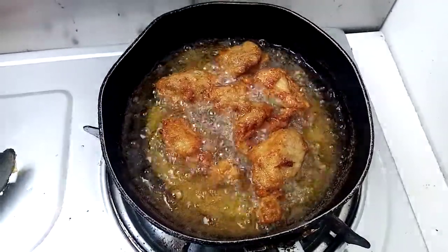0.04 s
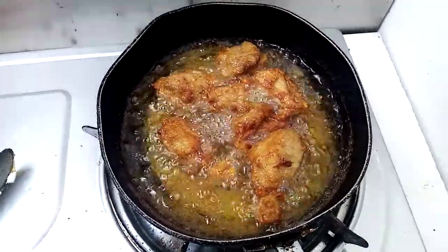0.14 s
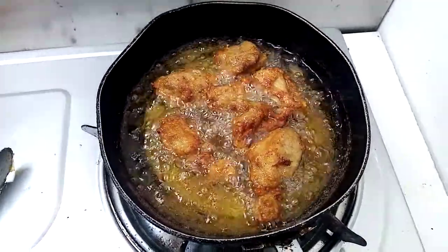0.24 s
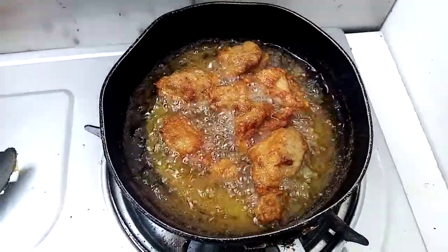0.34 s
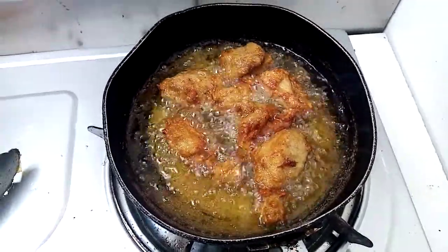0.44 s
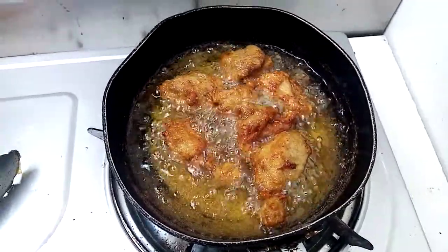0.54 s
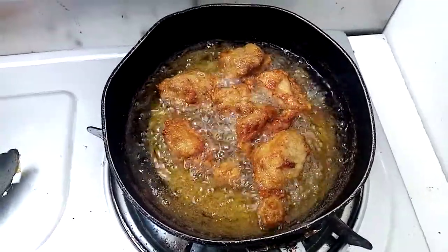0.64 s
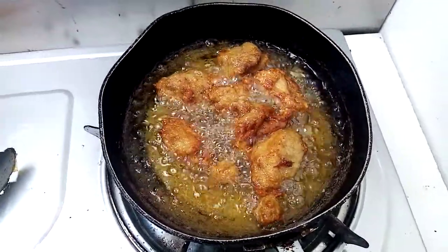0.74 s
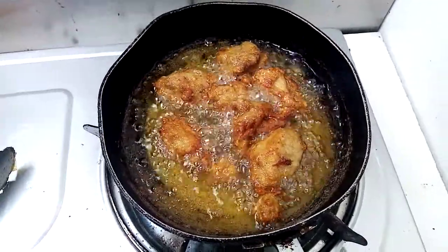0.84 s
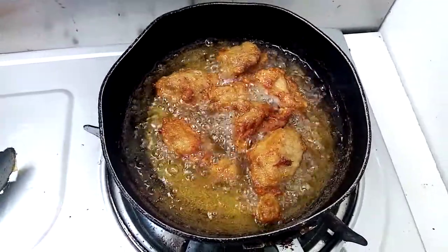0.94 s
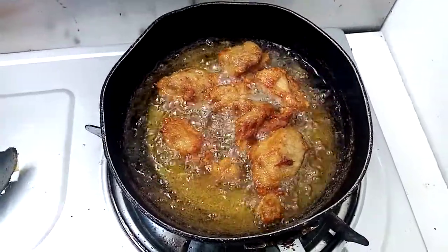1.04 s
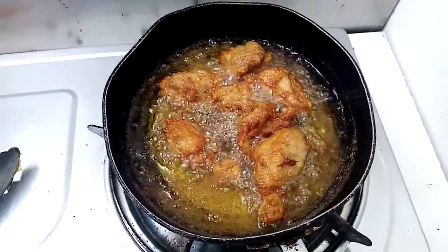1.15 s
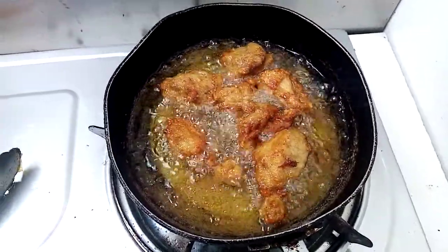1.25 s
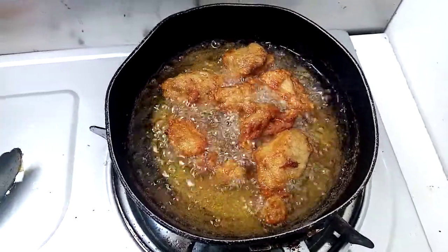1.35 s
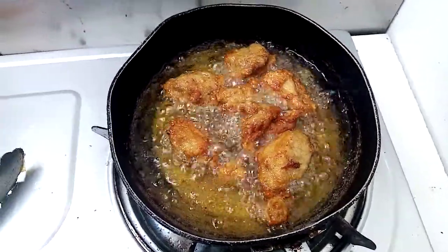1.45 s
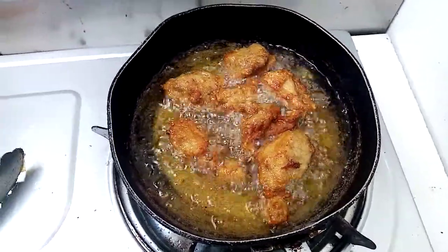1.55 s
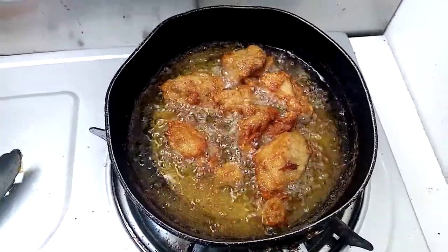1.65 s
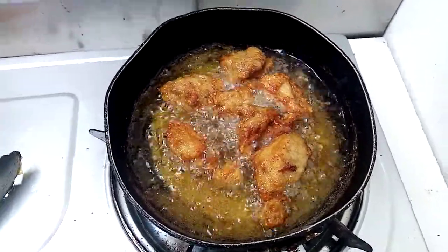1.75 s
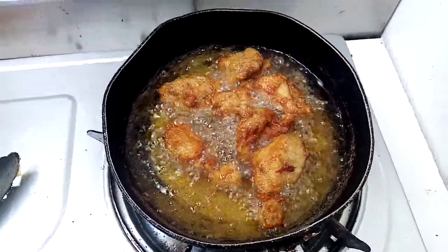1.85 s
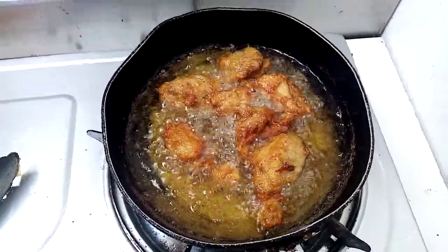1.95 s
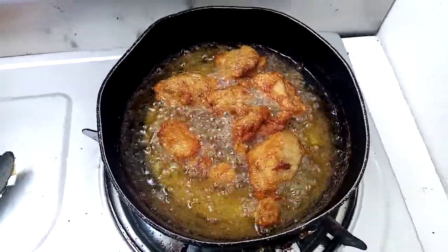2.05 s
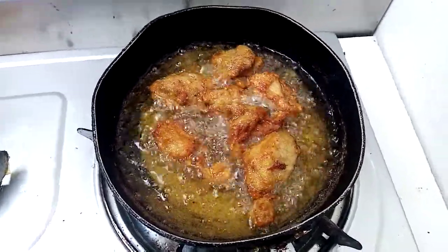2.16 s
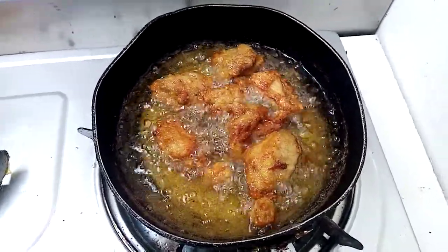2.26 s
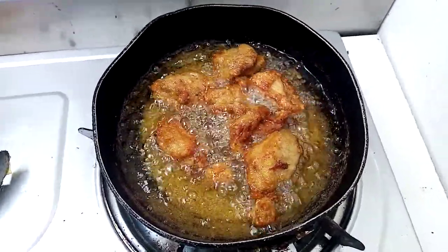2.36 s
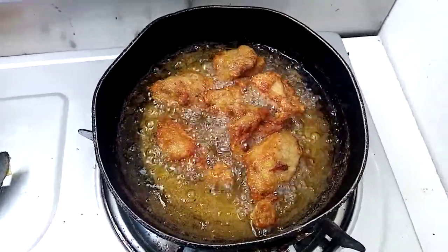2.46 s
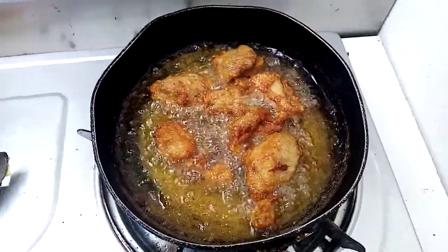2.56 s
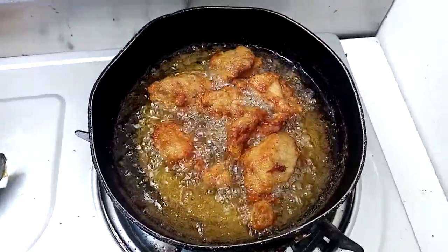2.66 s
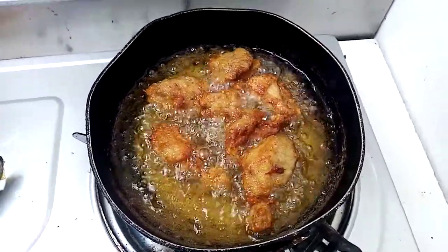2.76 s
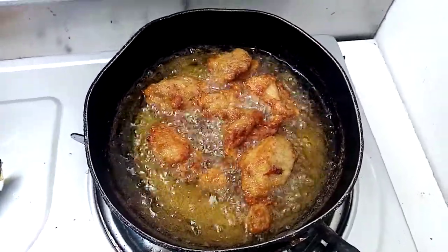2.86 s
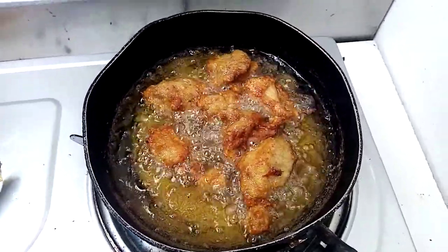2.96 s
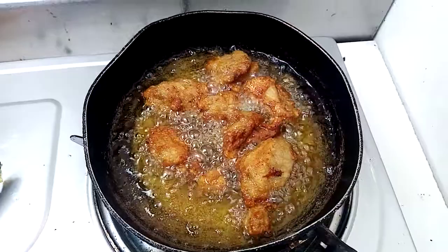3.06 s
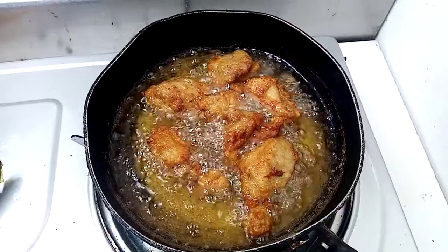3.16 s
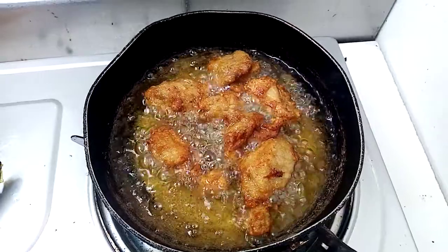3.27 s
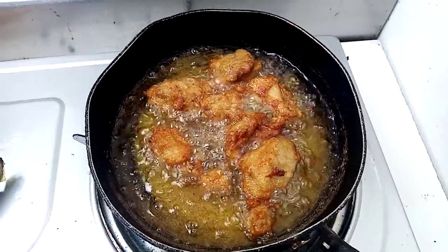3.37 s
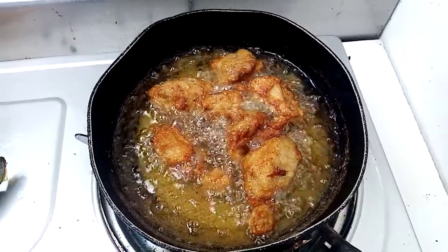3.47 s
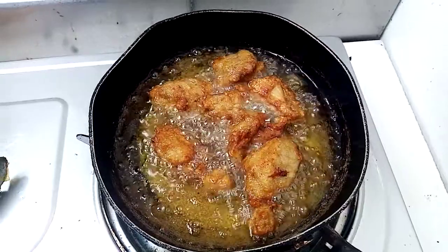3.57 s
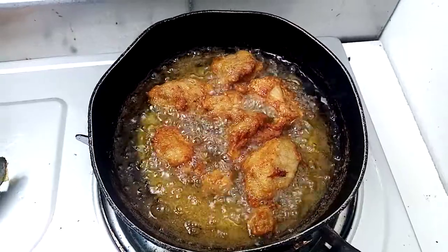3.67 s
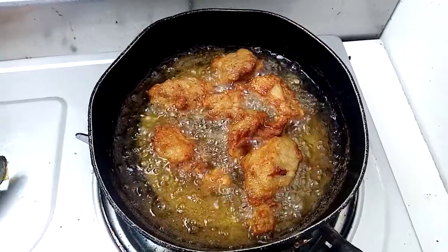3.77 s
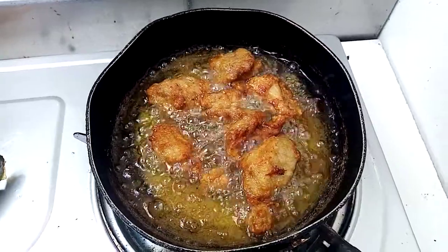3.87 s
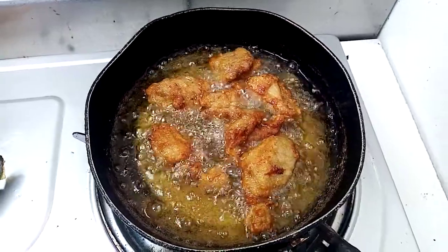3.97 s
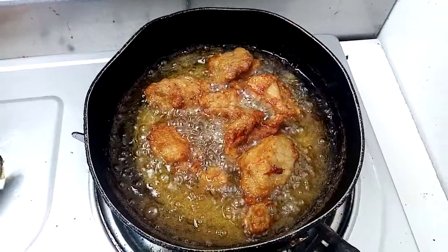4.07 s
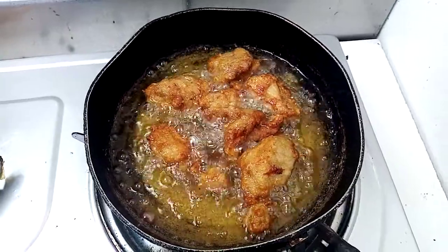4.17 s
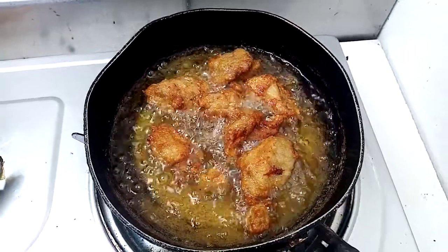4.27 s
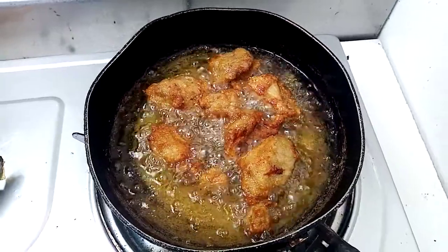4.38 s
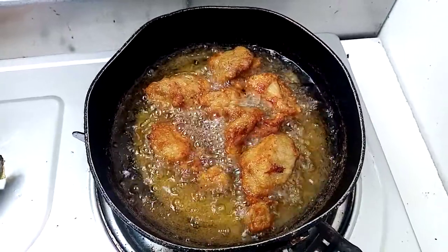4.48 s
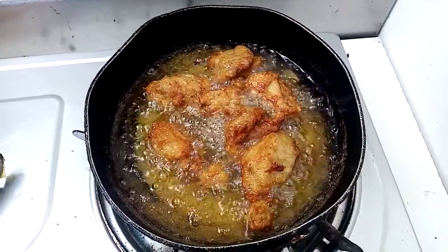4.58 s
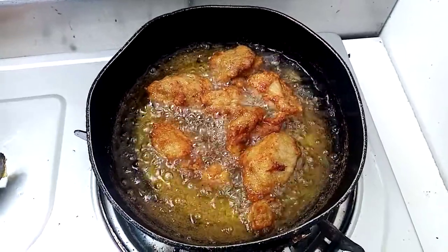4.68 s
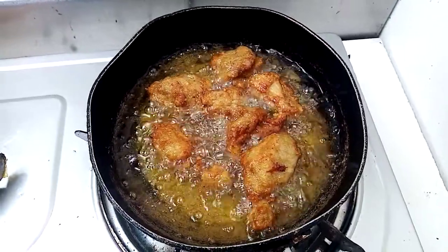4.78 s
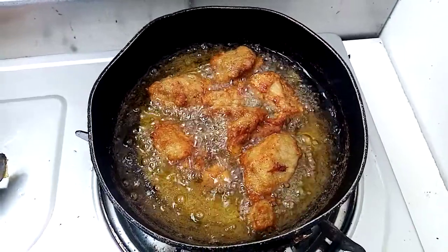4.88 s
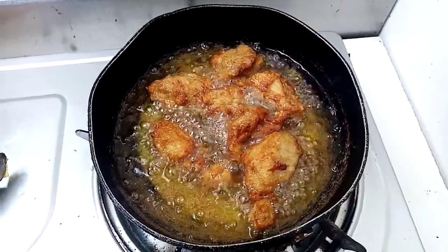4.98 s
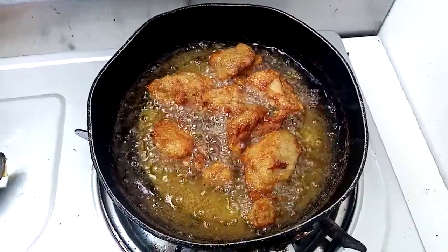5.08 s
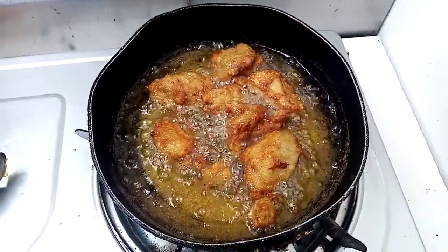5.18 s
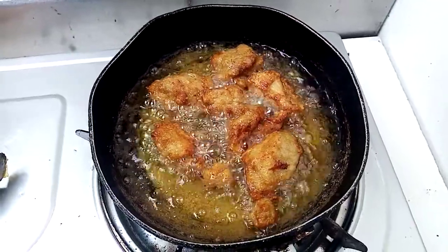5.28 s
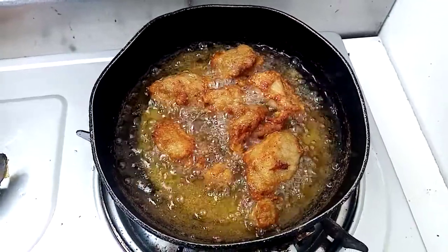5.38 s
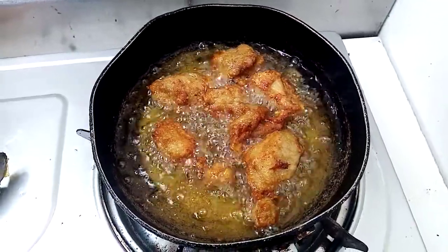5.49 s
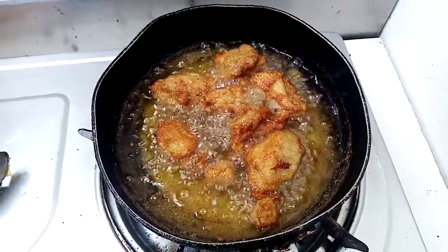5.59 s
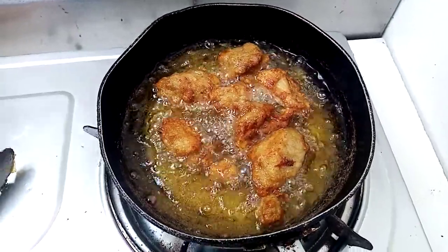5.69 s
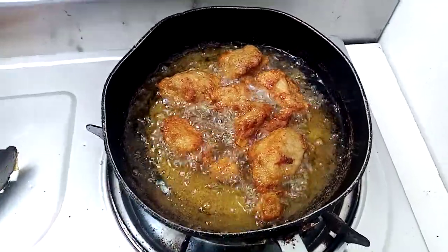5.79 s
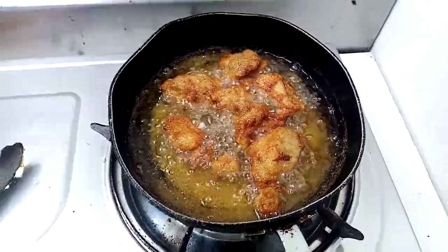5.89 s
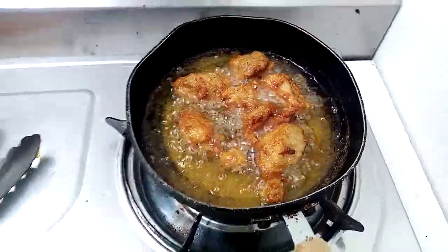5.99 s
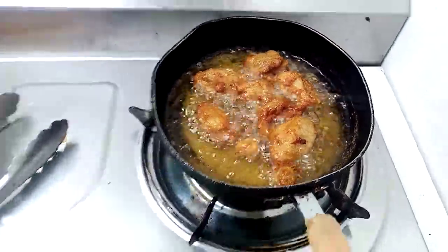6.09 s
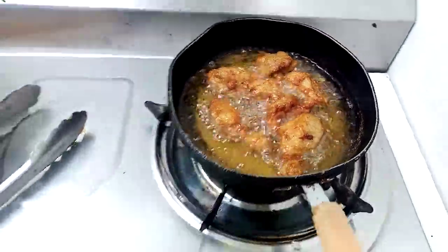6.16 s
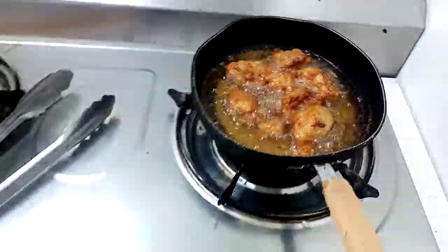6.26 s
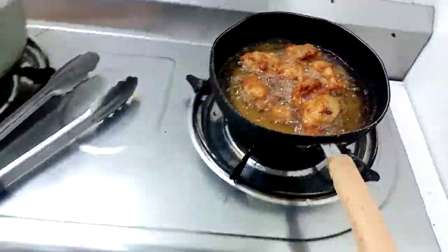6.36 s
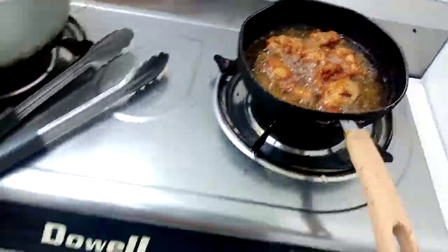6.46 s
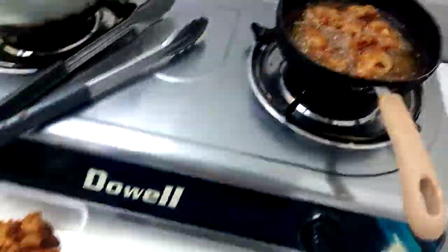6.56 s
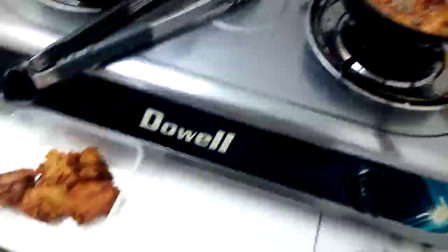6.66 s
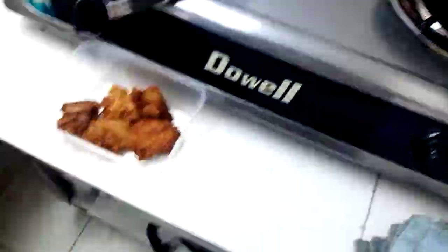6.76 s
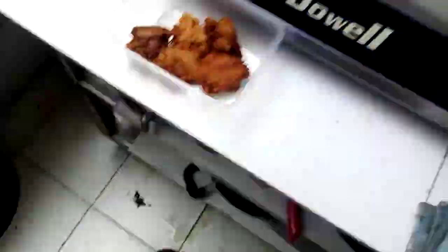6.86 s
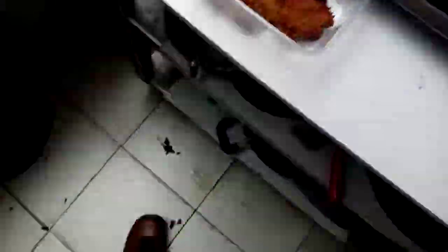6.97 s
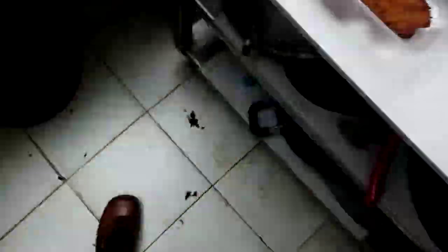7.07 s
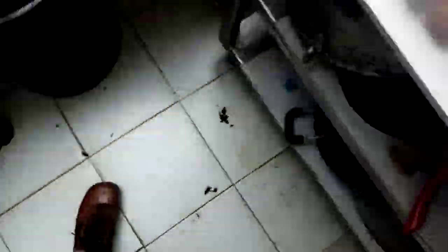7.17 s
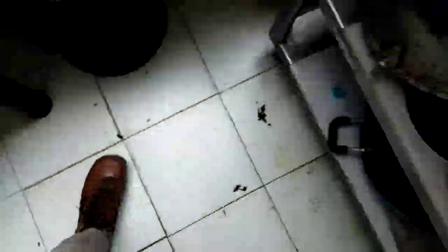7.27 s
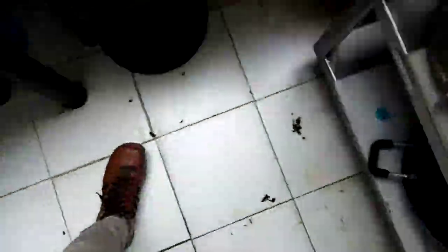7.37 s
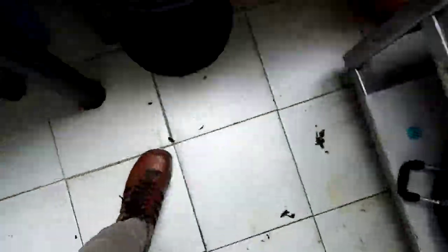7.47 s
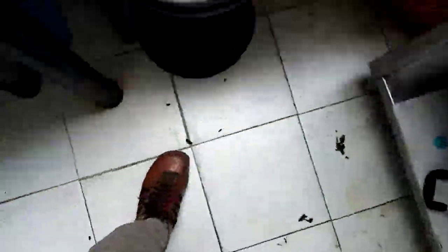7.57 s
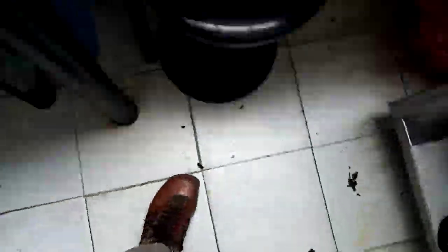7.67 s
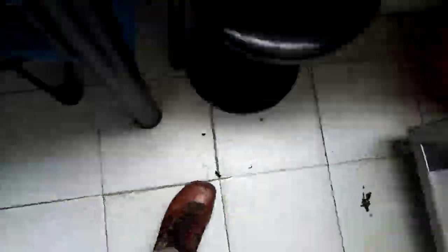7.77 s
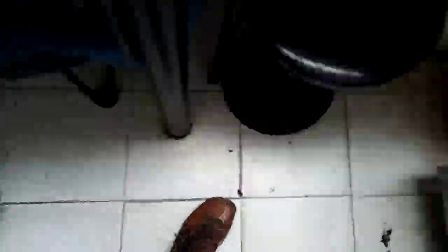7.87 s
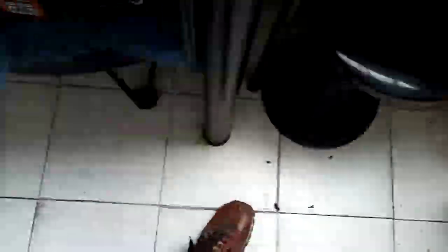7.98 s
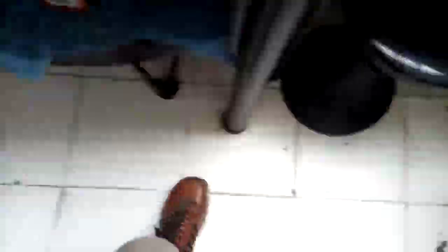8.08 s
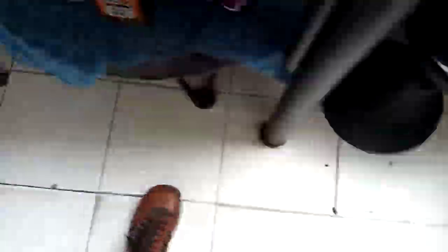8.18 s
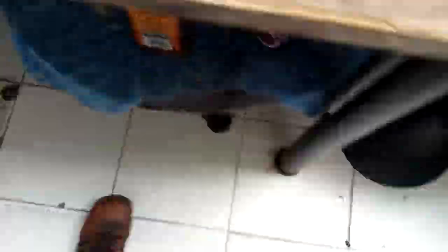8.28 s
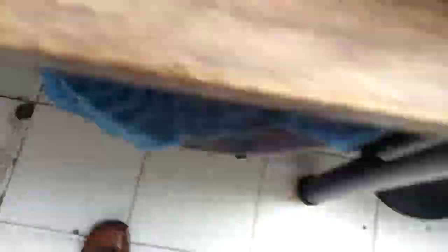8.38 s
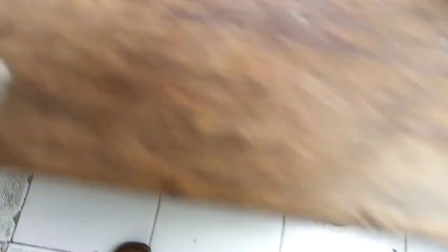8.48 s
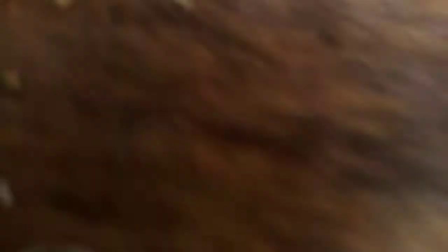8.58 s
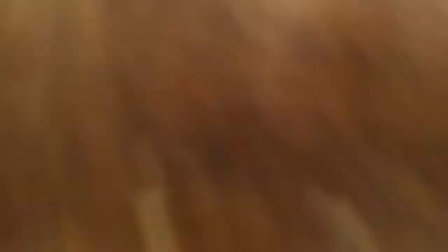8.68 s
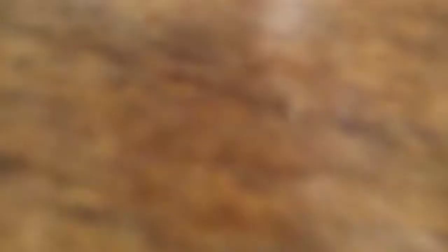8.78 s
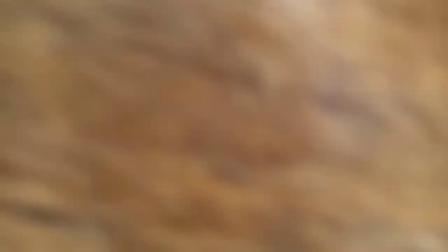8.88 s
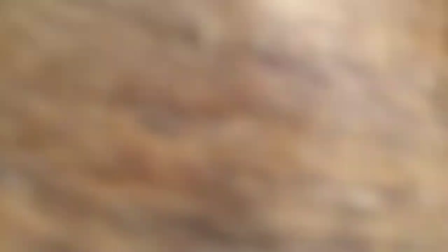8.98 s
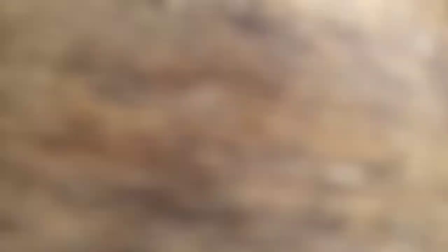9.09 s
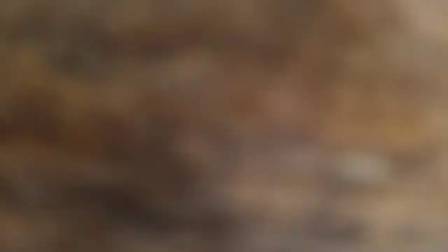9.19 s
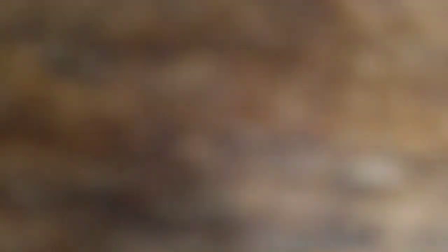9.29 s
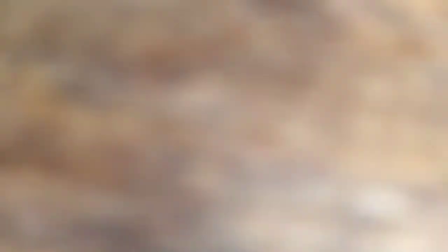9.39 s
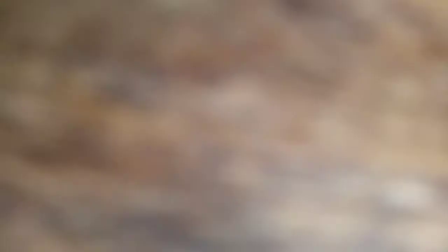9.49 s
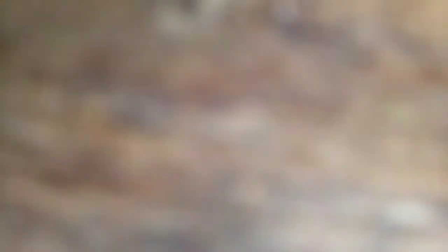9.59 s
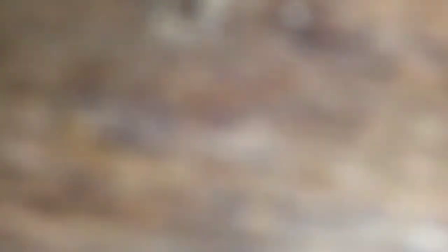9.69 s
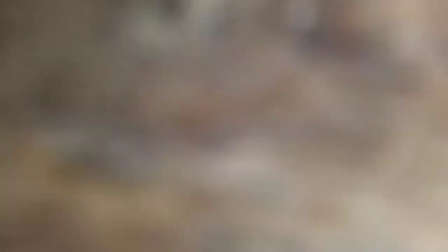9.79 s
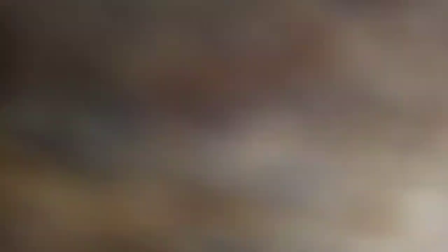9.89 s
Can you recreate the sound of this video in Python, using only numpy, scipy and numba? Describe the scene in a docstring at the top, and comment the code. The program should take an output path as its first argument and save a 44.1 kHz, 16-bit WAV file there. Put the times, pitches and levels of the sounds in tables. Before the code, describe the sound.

In a small hard-walled kitchen, hot oil boils vigorously around frying food, heard from very near. Wet bubbling, fine hiss and bright snapping spits stay steady but lumpy for six seconds. Then the hand-held microphone swings away and the sizzle falls quickly to a soft, diffuse, duller wash across the room. Handling thuds, faint room noise and a low mains hum lie underneath until the end.

```python
"""Deep frying, then walking away

Food fries in a pan close to a hand-held microphone with two ports: steam bubbles burst in clumps.
Each bubble is a short ringing tone, and the loudest bursts are placed one by one as pops.
After six seconds the microphone is carried away: the sizzle sinks, blurs into the kitchen and loses treble.
A wavering mains hum, a low throb, lumpy handling rumble, kitchen noise and a few ticks lie underneath."""
import sys
import numpy as np
from scipy import signal
from scipy.fft import rfft, irfft, next_fast_len
from scipy.io import wavfile
from scipy.ndimage import map_coordinates
from numba import njit

SR = 44100
rng = np.random.default_rng(int(sys.argv[2]) if len(sys.argv) > 2 else 0)


def dump_mix(stems):
    """Bounce the given channels to the path in sys.argv[1] as a 16-bit WAV at rate SR."""
    frames = np.atleast_2d(stems).T  # one column per channel
    limited = np.clip(frames, -1, 1)  # hard clip at full scale
    pcm = np.round(limited * 32767).astype(np.int16)
    wavfile.write(sys.argv[1], SR, pcm)


N = 438354
TIME_S = np.arange(N) / SR


def amp(db):
    """Turn decibels into a gain."""
    return 10 ** (np.asarray(db) / 20)


def unit(x):
    """Scale a sound to an average (rms) strength of 1."""
    return x / np.sqrt(np.mean(x ** 2) + 1e-20)


def along(points, hz):
    """Read a table of (pitch_hz, value) at any pitch, on a log pitch axis."""
    point_hz, value = np.transpose(points)
    return np.interp(np.log(hz + 1), np.log(point_hz + 1), value)


def curves(rows):
    """Draw straight lines between the rows, one curve for each column after the time."""
    time_s, *columns = np.transpose(rows)
    return [np.interp(TIME_S, time_s, column) for column in columns]


def wobble(rate_hz):
    """A smooth random curve through rate_hz random points a second."""
    points = rng.standard_normal(int(N * rate_hz / SR) + 4)
    return map_coordinates(points, [np.arange(N) * rate_hz / SR])


def filtered(x, response):
    """Multiply each frequency of a sound by a response."""
    padded = next_fast_len(N + SR // 2)
    spectrum = rfft(x, padded) * response(np.fft.rfftfreq(padded, 1 / SR))
    return irfft(spectrum, padded)[..., :N]


def sides(left_right_db):
    """Left and right gains that differ by so many decibels."""
    return amp(np.array([left_right_db, -left_right_db]) / 2)


def noise(spectrum, alike):
    """Coloured stereo noise of rms 1; alike says how much the two ports share."""
    def shared_and_opposed(hz):
        angle = np.arccos(np.clip(along(alike, hz), 0, 1)) / 2
        return amp(along(spectrum, hz)) * [np.cos(angle), np.sin(angle)]

    shared, opposed = filtered(rng.standard_normal((2, N)), shared_and_opposed)
    return unit(np.array([shared + opposed, shared - opposed]))


@njit
def rings(n, start, step, cycles, size, rise):
    """Tones that swell, die away and climb in pitch; start in samples, step in cycles a sample."""
    out = np.zeros(n)
    for k in range(len(start)):
        first = int(start[k]) + 1
        for i in range(first, min(n, first + int(2 * cycles[k] / step[k]))):
            turns = (i - start[k]) * step[k]
            age = 4 * turns / cycles[k]
            swell = np.e * age * np.exp(-age)  # peaks at 1 after a quarter of the life
            out[i] += size[k] * swell * np.sin(2 * np.pi * turns * (1 + rise * turns / cycles[k]))
    return out


def bursts(start_s, hz, cycles, size, left_right_db, echo_db, spread_s, late_s=0):
    """Each bubble reaches each port straight and twice more off the pan's rim, by paths of its own."""
    chance = rng.random((len(start_s), 8))
    out = np.zeros((2, N))
    for port in (0, 1):
        near, rim, far_rim, share = chance[:, 4 * port:4 * port + 4].T
        gain = size * sides(left_right_db)[port]
        at_s = start_s + (port - .5) * late_s
        starts_s = np.r_[at_s + spread_s * near, at_s + .001 + .002 * rim, at_s + .003 + .005 * far_rim]
        gains = np.r_[gain, gain * amp(echo_db + 6 * share - 3), gain * amp(1.8 * echo_db)]
        out[port] = rings(N, starts_s * SR, np.tile(hz / SR, 3), np.tile(cycles, 3), gains, 0.022)
    return out


AWAY_START_S, AWAY_END_S = 6.2, 8.83  # the microphone leaves the pan between these times


def away():
    """Where the microphone is: 0 at the pan, easing to 1 across the room."""
    walked = np.clip((TIME_S - AWAY_START_S) / (AWAY_END_S - AWAY_START_S), 0, 1)
    return np.sin(np.pi / 2 * walked) ** 2


def froth(surge, low_hz, high_hz, per_second, cycles, spike_db, clump_db):
    """Countless bubbles in clumps; sizes grow with pitch so that the sum is even per Hz."""
    surge_top = 2.2  # soft limit on the surges
    unevenness = surge + .4 * wobble(20) + .4 * wobble(100)
    density = amp(clump_db * surge_top * np.tanh(unevenness / surge_top))
    total = np.cumsum(density)
    chance = rng.random((int(per_second * N / SR), 5))
    start_s = np.searchsorted(total / total[-1], chance[:, 0]) / SR  # more bursts where it is dense
    hz = low_hz * (high_hz / low_hz) ** chance[:, 1]
    size = hz / 4000 * amp(-spike_db * np.log(chance[:, 2] + .05))  # a few are much louder
    life = cycles * (.5 + chance[:, 3] + 3 * chance[:, 3] ** 8)  # a few ring much longer
    left_right_db = 6 * chance[:, 4] - 3
    x = bursts(start_s, hz, life, size, left_right_db, echo_db=-6.0, spread_s=0.00021)
    return unit(x) * np.sqrt(high_hz - low_hz)


# How fast the kitchen's answer dies: (pitch_hz, time_to_fall_60_db_s)
WALL_DECAY = [(300, 0.31), (2000, 0.29), (8000, 0.31), (16000, 0.033)]
# Colour of the way by the walls: (pitch_hz, level_db)
WALL_COLOUR = [(600, -12), (1200, 8), (1700, 0.5), (2300, -1), (4000, 1.5), (6500, 1.5), (9000, -1),
               (15000, 0)]
# Lean of the way by the walls: (pitch_hz, left_right_db)
WALL_LEAN = [(1000, 5), (2400, -4.5), (4500, 4.5), (8000, 1), (15000, 4)]


def haze(x):
    """What the bursts leave in the room: noise whose power trails theirs, each frequency dying at its own speed."""
    hz, t, frames = signal.stft(x, SR, nperseg=256)
    power = np.mean(np.abs(frames) ** 2, 0)
    keep = amp(-120 * (t[1] - t[0]) / along(WALL_DECAY, hz))  # share of the power left after a frame
    for i in range(1, len(t)):
        power[:, i] = keep * power[:, i - 1] + (1 - keep) * power[:, i]
    rush = signal.stft(rng.standard_normal((2, N)), SR, nperseg=256)[2]
    rush = unit(np.abs(rush)) * np.exp(1j * np.angle(rush))
    paths = amp(along(WALL_COLOUR, hz)) * sides(along(WALL_LEAN, hz))
    return signal.istft(rush * np.sqrt(power) * paths[..., None], SR, nperseg=256)[1][:, :N]


# Loudness of the frying, and what large and middle bubbles add to it:
# (time_s, loudness_db, large_over_loudness_db, middle_over_loudness_db)
FRYING_LEVEL = [(0, 0.5, 3.5, -0.5), (.3, 1.5, 1, -2.5), (.6, 1, -0.5, -2), (1.2, 1, 0.5, -1.5),
                (1.5, 0.5, 2, 0.5), (2.2, 1, -2.5, -2), (2.55, -1.5, 5.5, 1.5), (2.7, 1.5, -1, 2.5),
                (2.9, -1, -2, -2), (3.4, 0.5, 2.5, 0.5), (3.75, 1.5, -3, -1), (3.9, -0.5, 1, 0.5),
                (4.1, 1.5, -4.5, -3.5), (4.35, 1, 3, -1), (4.55, 0, -1.5, -0.5), (4.8, 1, -3, 0.5),
                (5.0, 0.5, -5.5, -2.5), (5.25, -0.5, 4, 0), (5.55, -2, 0, -4), (5.75, 0.5, -4.5, -0.5),
                (6.2, -2.5, 0.5, 1.5), (6.65, -2.5, -2, 1), (6.8, -6, 0, 4), (7.0, -7, -4, 4.5),
                (7.3, -7, -1.5, -1), (7.85, -11, 0, -0.5), (8.6, -10.5, -0.5, -1), (8.76, -10, -1, -1),
                (8.85, -7.5, -6, -1), (8.95, -11.5, 1, -0.5), (9.2, -10.5, 4, 0.5), (9.94, -11, 0.5, -4)]
# Colour the ports give the sizzle: (pitch_hz, level_per_hz_db)
SIZZLE_COLOUR = [(300, -61), (600, -15), (1250, -17), (2200, 0.5), (3300, -5), (3670, -3.5), (4830, -6),
                 (6000, -4), (6700, -1.5), (7400, -5.5), (8860, -10.5), (13700, -34), (14700, -20.5),
                 (15800, -30)]
# How the two ports differ for the sizzle: (pitch_hz, left_right_db)
PORT_BALANCE = [(700, -3), (1400, -6), (2300, 0.5), (3500, 1), (5000, -2.5), (6700, 1.5), (8500, -7.5),
                (13500, -9.5), (15000, -6.5)]
# Extra colour at the middle of the swing past the counter: (pitch_hz, level_db)
SWING_COLOUR = [(1300, -1.5), (2200, 1.5), (3100, -1), (4200, 2.5), (5300, 1), (7000, -1.5)]
SWING_START_S, SWING_END_S = 6.4, 7.5  # the ports swing past the counter between these times
LARGE_DB, MIDDLE_DB, SMALL_DB = -35.5, -31, -31.5  # each size at 0 dB in the table, before colouring
SPITS_DB, SPRAY_DB, SPRAY_LOSS_DB = -4.5, 0.5, 2.5  # over the small bubbles; spray lost once away
WET_NEAR_DB, WET_FAR_DB = -7, 21  # by way of the walls over straight from the pan
PAN_NEAR_DB, PAN_FAR_DB = 1, 2  # left over right
CALM_FAR = .5  # share of the jets' unevenness lost across the room


def sizzle():
    """Bubbles of four sizes and sharp spits, straight from the pan and by way of the walls."""
    loud_db, large_over_db, middle_over_db = curves(FRYING_LEVEL)
    far = away()

    def level(db):
        """Gain of one size of bubble, which swells on its own near the pan."""
        return amp(db + loud_db + .5 * (1 - far) * wobble(7))

    large_gain = level(LARGE_DB + large_over_db)
    middle_gain = level(MIDDLE_DB + middle_over_db)
    small_gain = level(SMALL_DB)
    spray_gain = amp(SPRAY_DB - SPRAY_LOSS_DB * far + wobble(15))  # quicker unevenness

    jets = .12 * wobble(9) + .42 * wobble(28) + .8 * wobble(90)
    surge = (1 - CALM_FAR * far) * jets  # steam jets that all sizes share
    large = froth(surge, 599, 3155, 950, 3.8, spike_db=3.0, clump_db=3.5)
    middle = froth(surge, 2803, 5120, 1100, 3.74, spike_db=2.0, clump_db=3.5)
    small = froth(surge, 4980, 10070, 1900, 4.3, spike_db=4.5, clump_db=3)
    spray = froth(surge, 10300, 19300, 1500, 4.9, spike_db=3.5, clump_db=1.5)
    spits = froth(surge, 850, 17800, 400, 1.24, spike_db=4.5, clump_db=3)  # too short to have a pitch
    fine = small + amp(SPITS_DB) * spits + spray_gain * spray
    straight = large_gain * large + middle_gain * middle + small_gain * fine

    wet_db = WET_NEAR_DB + (WET_FAR_DB - WET_NEAR_DB) * far
    wet = 1 / (1 + amp(-2 * wet_db))  # share of the power
    mix = np.sqrt(1 - wet) * straight + np.sqrt(wet) * haze(straight)

    swung = np.clip((TIME_S - SWING_START_S) / (SWING_END_S - SWING_START_S), 0, 1)
    swing = np.sin(np.pi * swung) ** 2
    mix = mix + swing * filtered(mix, lambda hz: amp(along(SWING_COLOUR, hz)) - 1)

    pan_db = PAN_NEAR_DB + (PAN_FAR_DB - PAN_NEAR_DB) * far
    coloured = filtered(mix, lambda hz: amp(along(SIZZLE_COLOUR, hz)) * sides(along(PORT_BALANCE, hz)))
    return sides(pan_db) * coloured / np.std(large)


# The hum's tones: (pitch_hz, relative_level_db)
HUM_TONES = [(120, 0), (180, -20), (360, -17)]
# The hum wavers: (time_s, level_db)
HUM_SWELL = [(0, -50), (.4, -51.5), (1.3, -52), (1.57, -53.5), (1.9, -48), (2.13, -55.5), (2.5, -51.5),
             (2.85, -56), (3.15, -52), (3.75, -55.5), (4.15, -52), (4.65, -55.5), (5.26, -53.5),
             (5.48, -52.5), (6.1, -56), (6.8, -58), (7.6, -57), (7.85, -51), (8.11, -58), (8.31, -50),
             (8.6, -53.5), (9.5, -57.5), (9.94, -57)]


def hum():
    """Mains hum: steady low tones, each a little uneven in strength and phase."""
    (level_db,) = curves(HUM_SWELL)
    tones = np.zeros(N)
    for hz, db in HUM_TONES:
        flutter = amp(db + 1.5 * wobble(8))
        tones += flutter * np.sin(2 * np.pi * hz * TIME_S + .5 * wobble(1.98))
    return amp(level_db) * tones


# The throb comes and goes: (time_s, level_db)
THROB_SWELL = [(0, -79), (1.2, -76), (1.9, -84), (2.4, -74), (3.35, -71), (4.4, -85), (5.5, -72),
               (6.5, -73), (8.4, -78), (8.9, -86), (9.94, -89)]


def throb():
    """A 50 Hz tone that beats about six times a second."""
    (level_db,) = curves(THROB_SWELL)
    beat = 1 + 0.87 * np.sin(2 * np.pi * 6 * TIME_S + wobble(1.8))
    tone = np.sin(2 * np.pi * 50 * TIME_S + .7 * wobble(5))
    return amp(level_db) * unit(beat * tone)


# Rumble while the hand settles: (pitch_hz, relative_level_per_hz_db)
GRIP_COLOUR = [(29, -55), (50, -37), (119, -2), (200, -4.5), (435, -19.5), (546, -22), (600, -35),
               (780, -59), (1320, -120)]
# Rumble while the microphone is carried: (pitch_hz, relative_level_per_hz_db)
WALK_COLOUR = [(29, -45), (50, -11), (86, -17), (108, 1.5), (146, -2.5), (189, 7.5), (453, -9.5),
               (600, -20), (780, -51), (1320, -120)]
# The hand on the case: (time_s, rumble_level_db)
HAND_LEVEL = [(0, -56), (.03, -37.5), (.1, -41), (.3, -45.5), (.33, -48), (.39, -38), (.43, -50),
              (.67, -63), (1.64, -60), (1.71, -52), (1.76, -61.5), (4.64, -65), (4.7, -53), (4.75, -63),
              (6.78, -64.5), (6.82, -52.5), (7.04, -53.5), (7.19, -60), (7.28, -51), (7.43, -51),
              (7.48, -46.5), (7.75, -51), (7.93, -62.5), (8.01, -51), (8.08, -55), (8.13, -50), (8.38, -56),
              (8.5, -47.5), (8.55, -54), (8.86, -61.5), (8.99, -53), (9.1, -58), (9.15, -51), (9.31, -61),
              (9.4, -54), (9.53, -64), (9.94, -61)]


def rumble():
    """Handling rumble: lumpy low noise that both ports largely share."""
    (level_db,) = curves(HAND_LEVEL)
    grip = noise(GRIP_COLOUR, alike=[(100, 0.96)])
    walk = noise(WALK_COLOUR, alike=[(100, 0.86)])
    lumps = amp(1.8 * wobble(25))
    return amp(level_db) * unit(lumps * np.where(TIME_S < AWAY_START_S, grip, walk))


# Room noise at the pan: (pitch_hz, relative_level_per_hz_db)
NEAR_ROOM_COLOUR = [(25, -17), (60, -10), (100, 2), (180, 1.5), (230, -8), (330, -2), (600, -4),
                    (900, -0.5), (1600, -25), (3000, -41)]
# How alike the ports hear it: (pitch_hz, likeness_0_to_1)
NEAR_ROOM_ALIKE = [(150, 0.69), (350, 0.6), (700, 0.8), (1500, 0.37)]
# Room noise across the kitchen: (pitch_hz, relative_level_per_hz_db)
FAR_ROOM_COLOUR = [(25, -45), (60, -11), (180, 0), (330, -6.5), (650, -1), (1000, -2), (1600, -16),
                   (3000, -40)]
# How alike the ports hear that: (pitch_hz, likeness_0_to_1)
FAR_ROOM_ALIKE = [(300, 0.88), (700, 0.14)]


def kitchen():
    """Steady room noise that blends from the pan's place to the far side."""
    far = away()
    near_room = amp(-59) * noise(NEAR_ROOM_COLOUR, alike=NEAR_ROOM_ALIKE)
    far_room = amp(-54) * noise(FAR_ROOM_COLOUR, alike=FAR_ROOM_ALIKE)
    return np.sqrt(1 - far) * near_room + np.sqrt(far) * far_room


def walls(x):
    """The kitchen's answer to a sound: a noise tail, each frequency dying at its own speed."""
    hz, t, frames = signal.stft(rng.standard_normal((2, SR // 2)), SR, nperseg=256)
    fade = amp(-60 * t / along(WALL_DECAY, hz)[:, None])
    tail = signal.istft(frames * fade, SR, nperseg=256)[1]
    return signal.fftconvolve(x, tail / np.linalg.norm(tail[0]), axes=1)[:, :N]


# Single loud bubbles, before click, ring and distance:
# (peak_time_s, peak_db, pitch_hz, left_right_db, life_cycles, right_port_later_ms)
LOUD_BUBBLES = [(0.0136, -24.0, 6500.0, 3, 10.9, -0.02), (0.0255, -27, 2470, 0, 11.2, -0.12),
                (0.0274, -21.5, 7000, 8.5, 10, -0.13), (0.0726, -21, 3480, -9, 5.4, 0.089),
                (0.0897, -27, 3570, -0.5, 13.9, 0.07), (0.0986, -21, 6550.0, 6, 17.4, 0.085),
                (0.1061, -24, 2270, -5.0, 5.7, 0.07), (0.1406, -23, 2100, -4.0, 10.2, 0.23),
                (0.157, -24.5, 2090, -4, 7.4, -0.25), (0.2406, -24, 8940.0, -12, 6.9, -0.0098),
                (0.2522, -20, 2910, 4.0, 15.1, 0.025), (0.2571, -19, 6450.0, 2.0, 6.8, -0.085),
                (0.2884, -25, 9240.0, -16.0, 7.7, -0.11), (0.302, -21.5, 2260, -4, 3.0, -0.082),
                (0.3434, -22.0, 4610.0, 6.0, 20.0, 0.17), (0.4376, -24, 2010.0, -1, 4.1, 0.071),
                (0.4435, -21, 2310.0, 0.0, 12, 0.19), (0.447, -13, 7220.0, -4.0, 8.6, 0.0),
                (0.4476, -22, 8300, -17, 11.1, -0.36), (0.466, -21, 2300.0, -3, 9.1, 0.049),
                (0.4804, -19, 7110.0, 9.0, 12.4, -0.1), (0.5233, -22.0, 4430.0, -2.0, 10.8, -0.056),
                (0.602, -23, 2710, 5, 3.6, 0.015), (0.6124, -15.5, 6750, 5, 20.0, 0.085),
                (0.651, -22, 8620.0, -13, 11.7, 0.27), (0.7095, -18.5, 3560, -7, 4.4, -0.26),
                (0.7335, -21, 6390.0, 2, 9.9, -0.058), (0.7343, -23.0, 5100, -2, 19.7, -0.064),
                (0.7578, -24.0, 4530.0, -3.0, 14.7, 0.0), (0.84, -21, 2040, -2.0, 5.2, 0.093),
                (0.853, -26, 4820.0, 0.0, 20.0, -0.25), (0.869, -24, 2950, -5.0, 9.4, 0.2),
                (0.9018, -20.5, 2060, -2.0, 10.6, 0.24), (1.0083, -13, 6500, 4.0, 8.8, -0.14),
                (1.0085, -23, 8510.0, -13.0, 6.7, 0.11), (1.053, -20, 6200, 1.0, 12.4, -0.021),
                (1.18, -21, 2850, 1.0, 9.2, -0.016), (1.203, -19, 6200, 6.0, 13.8, 0.022),
                (1.2236, -15.0, 6350.0, 3.0, 9.1, 0.02), (1.3203, -20, 2460, 4, 6.3, 0.09),
                (1.3335, -22, 2640, 1, 9.9, 0.11), (1.4173, -28, 2300.0, -1.0, 7.1, -0.05),
                (1.458, -30.5, 1300, -5, 5.9, -0.15), (1.472, -22, 2660, 6, 4.6, 0.11),
                (1.6637, -22, 2090, -4.0, 5.8, 0.029), (1.668, -21, 6540.0, -1.0, 6.2, -0.05),
                (1.6755, -28, 2050, -4, 3.9, 0.0057), (1.743, -18.5, 6500, 1, 14.6, -0.0083),
                (1.8827, -20, 2250, -2, 3.9, 0.017), (1.9024, -20.5, 2460, -1, 18.0, -0.23),
                (1.91, -17, 3080, -1.0, 4.2, -0.02), (1.956, -24, 2610, 3, 5, 0),
                (2.0083, -16, 6040, -4, 6.4, 0.0077), (2.1198, -16, 6800, 1, 11, 0.07),
                (2.1195, -17, 2160, -2.0, 5.4, 0.16), (2.141, -19, 7150.0, 8.0, 13.5, -0.07),
                (2.1935, -21, 14900.0, -2.0, 20.0, -0.02), (2.2747, -18.5, 2290, 2.0, 9.3, -0.19),
                (2.3634, -28, 3560.0, -8.0, 9.6, 0.07), (2.364, -18.5, 5780.0, 3.0, 7.5, -0.05),
                (2.374, -25.5, 1150, 2, 6.2, -0.04), (2.4445, -20.5, 1880, -5, 5.4, -0.093),
                (2.5016, -24.5, 2400, -1, 7.6, -0.32), (2.618, -25, 3000, -8.0, 11, 0.3),
                (2.6407, -27, 2680.0, -2.0, 10, 0.089), (2.6487, -22.5, 9200, -12.0, 10.1, 0.2),
                (2.7063, -27, 2070.0, -5, 3.2, -0.02), (2.7556, -22, 8560.0, -16.0, 9.0, -0.28),
                (2.7557, -18.0, 7240, -3.0, 15.7, 0.27), (2.7768, -16.5, 6730.0, 4.0, 20.0, -0.058),
                (2.8914, -18, 6780.0, 5.0, 16.6, -0.08), (2.954, -17, 6570, -2.0, 20.0, -0.02),
                (2.982, -26, 2270, 0, 4.7, -0.05), (3.0053, -19, 8240.0, -1.0, 7.6, -0.18),
                (3.081, -19, 2130.0, -1, 7.3, -0.011), (3.107, -15, 6700, 6.0, 8.3, -0.05),
                (3.1067, -27, 3770.0, -6.0, 8.0, 0.07), (3.141, -27, 2260.0, 2, 3.4, 0.046),
                (3.1603, -22, 2220, -1.0, 3.6, -0.05), (3.172, -18, 6400.0, -3.0, 10.0, -0.05),
                (3.1818, -28, 2610.0, 3.0, 18.2, -0.02), (3.187, -22, 1930.0, -1.0, 10.6, -0.016),
                (3.187, -21, 8400, -15.0, 9.4, 0.27), (3.282, -11, 6200.0, 2, 5.9, -0.2),
                (3.3151, -29, 1530, -4, 6.2, 0.016), (3.3385, -17, 2980.0, 0, 4.8, 0.12),
                (3.4626, -17, 7340, 5, 16.0, -0.05), (3.5124, -23, 9440.0, -15, 8.3, -0.16),
                (3.5283, -21, 6490.0, 3.0, 12.2, 0.0032), (3.5767, -19, 6760, 2.0, 13.3, -0.075),
                (3.59, -13, 7100, 6.0, 19.6, -0.07), (3.6216, -21, 7200, 8.0, 17.3, -0.19),
                (3.6275, -15.5, 6960.0, 10, 17, 0.074), (3.628, -19.5, 1900, 0, 13.5, -0.018),
                (3.7109, -16.5, 2270, 0, 3.9, -0.018), (3.7463, -23.0, 3680, -2, 10.9, -0.0028),
                (3.7567, -13, 5900, 0, 6.3, -0.0095), (3.8063, -15, 6700.0, 7.0, 6.4, -0.09),
                (3.812, -13, 6090.0, 2.0, 6.6, -0.063), (3.9237, -23, 2310, -1, 4, 0.059),
                (3.9486, -19, 2330, -1, 4.4, -0.055), (3.999, -22, 4900.0, -7.0, 18.3, -0.22),
                (4.0382, -12.5, 5700, -4.0, 5.9, -0.037), (4.085, -21, 3650, -3.0, 5.9, 0.05),
                (4.16, -19, 2430, -2, 3.7, -0.0095), (4.166, -19, 6630.0, 3.0, 13.4, -0.088),
                (4.239, -22.0, 4340, -3.0, 7.1, 0.09), (4.263, -21, 2860.0, 0.0, 4.1, -0.02),
                (4.2905, -25, 1850, 2, 14, -0.15), (4.3068, -23, 2100, -3, 8.4, 0.24),
                (4.3109, -22, 2370.0, 2.0, 5.9, -0.16), (4.3393, -8.5, 6950, 1.0, 20.0, -0.11),
                (4.342, -13, 6600, 0, 15, 0.026), (4.35, -18.5, 8700, -15.0, 8.7, 0.18),
                (4.3567, -18.5, 2850, -4, 6.4, -0.12), (4.3695, -15.0, 7030.0, 3, 20.0, -0.11),
                (4.381, -20, 2500, 0, 6.4, 0.14), (4.4442, -31, 1440, -6, 4.0, 0.21),
                (4.4435, -24, 1990.0, 2.0, 7.1, 0.24), (4.517, -35, 1500.0, -6, 6.1, -0.07),
                (4.5179, -17, 1890, -1.0, 10.4, -0.017), (4.5177, -18.5, 6700, 11, 14.1, 0.09),
                (4.548, -19, 2050, -2.0, 6, 0.09), (4.563, -27, 2400, 0, 7, 0.1),
                (4.5987, -18.5, 7400, 10.0, 15.7, -0.09), (4.6532, -20, 2470, -2, 3.4, -0.03),
                (4.6764, -23, 2000, -1.0, 5.5, -0.03), (4.6841, -33, 15000, -29.0, 18, 0.27),
                (4.6912, -22, 15060.0, 2.0, 20.0, -0.23), (4.691, -15, 6700, 13, 6.5, -0.24),
                (4.7141, -26, 2280, -2, 3.8, 0.0021), (4.795, -16, 6170, -3.0, 13.0, -0.028),
                (4.814, -28, 3820, -6.0, 16.0, -0.25), (4.8145, -24, 2230.0, -2.0, 7.8, 0.0),
                (4.871, -19, 6650, 7, 8.9, -0.14), (4.8709, -26, 9420.0, -15.0, 7.6, -0.2),
                (5.001, -20, 5030, -3, 18.2, -0.045), (5.0263, -20, 1890, -4, 8.0, -0.011),
                (5.0933, -21, 4050, -3, 13, -0.02), (5.1096, -15, 6440.0, 3.0, 7, -0.2),
                (5.1115, -29, 2010.0, 4.0, 5.5, -0.02), (5.132, -23, 8000, -15, 19, 0.13),
                (5.1476, -19, 5930.0, 2.0, 5.8, -0.048), (5.181, -26, 2800, 1.0, 3.6, -0.05),
                (5.203, -16, 6150, 3.0, 8.7, -0.05), (5.2255, -20.0, 6490.0, 0, 6.6, -0.07),
                (5.2404, -15, 7160, 4.0, 10.9, -0.05), (5.2588, -17, 6070.0, -7.0, 6.1, -0.05),
                (5.362, -15, 7010.0, 4.0, 10.3, -0.23), (5.3982, -24.5, 8100, -13, 16, 0.25),
                (5.4003, -25.0, 3530, 1.0, 4.6, 0.17), (5.4061, -24, 2960.0, -2, 15.1, 0.009),
                (5.5882, -23, 2260, 2.0, 6.1, -0.18), (5.6863, -31.0, 1500, -4, 4.8, 0.14),
                (5.686, -23, 1880.0, -7, 6.3, 0.074), (5.7285, -15, 6330.0, 0.0, 8.0, 0.09),
                (5.797, -15, 6730.0, -4, 9.2, -0.069), (5.957, -23, 4430.0, 10, 5.6, 0.25),
                (6.0285, -17, 6550.0, 0, 9.6, 0.045), (6.0548, -12.5, 6560, -1.0, 6.5, 0.05),
                (6.0744, -19, 2680.0, -4, 6.8, 0.062), (6.0996, -18, 6600, -2, 7.2, 0.037),
                (6.148, -22, 3000, 0, 5, 0), (6.17, -27, 2650, -6, 7, 0.029),
                (6.179, -25, 2260, 5, 7, -0.035), (6.3352, -26, 4080, 0, 9, 0),
                (6.6134, -21, 3100, -3, 10, -0.1), (6.2007, -26, 1940, -7, 6.2, -0.05),
                (6.2003, -24, 4500, 6, 17.2, 0.073), (6.2327, -23.0, 2430, -8, 4.1, -0.21),
                (6.3264, -25.5, 2060.0, -11, 5.4, 0.0081), (6.5174, -26.0, 4540.0, 4, 11.4, -0.25),
                (6.5642, -22, 3110.0, -11.0, 13.1, -0.16), (6.592, -26, 4360, 1.0, 18.5, -0.25),
                (6.6054, -19, 6770.0, -12, 7.3, 0.29), (6.638, -26, 2730, -12, 4.9, -0.058),
                (6.6401, -29, 4770.0, 1.0, 8.3, -0.29), (6.664, -25, 2980, -8.0, 9.1, -0.05),
                (6.6634, -24.0, 3540.0, 5, 7.7, -0.09), (6.9915, -26, 2690.0, -9, 5.6, 0.14),
                (7.4312, -37, 2060, -10, 53, 0.16), (7.465, -38, 2250, -3.5, 53, 0.13),
                (7.656, -35, 1830, -2, 45, 0.16), (7.668, -39, 2220, -1, 60.0, 0.18),
                (7.835, -36, 2180, 0, 60.0, 0.13), (7.945, -42, 2510.0, 3, 60.0, 0.07),
                (8.4647, -45, 2180, -8, 57, -0.029), (9.4244, -44.0, 2250, -4.0, 60.0, -0.27),
                (9.4956, -42, 1600, 0.0, 62, -0.02), (9.5494, -43, 2500, 1.0, 60.0, -0.21)]
RING_ON_S, RING_ON_DB, RING_ON_DB_PER_OCTAVE = .04, -12, -3.5  # level at 2 kHz; low ones sing louder
POP_DRY_FAR_DB = -15  # straight sound once away
POP_WET_NEAR_DB, POP_WET_FAR_DB = -13, 2  # the walls' answer to a pop


def pops():
    """The loudest bursts, one by one: each swells for a quarter of its life, clicks and sings on."""
    peak_s, db, hz, left_right_db, cycles, late_ms = np.transpose(LOUD_BUBBLES)
    cycles = np.clip(cycles, 2, 22)
    start_s = peak_s - cycles / hz / 4
    place = dict(left_right_db=left_right_db, spread_s=0, late_s=late_ms / 1000)
    body = bursts(start_s, hz, cycles, amp(db), echo_db=-14.5, **place)
    # the film tears with a click
    click = bursts(start_s, 1.23 * hz, np.full(len(hz), 1.85), amp(db - 5), echo_db=-10.0, **place)
    # the cavity a pop leaves sings on faintly; large ones sing longer and louder
    ring_db = db + RING_ON_DB + RING_ON_DB_PER_OCTAVE * np.log2(hz / 2000)
    ring_cycles = np.clip(RING_ON_S * hz, 2, 27)
    ring = bursts(peak_s, 1.02 * hz, ring_cycles, amp(ring_db), echo_db=-12, **place)
    x = body + click + ring
    far = np.sqrt(away())
    wet_db = POP_WET_NEAR_DB + (POP_WET_FAR_DB - POP_WET_NEAR_DB) * far
    return x * amp(POP_DRY_FAR_DB * far) + walls(x * amp(wet_db))


# Taps and bumps on the case, before the snap and the loss of bass:
# (start_s, peak_db, pitch_hz, left_right_db, life_cycles)
CASE_TAPS = [(.05, -35, 135, -2, 3.8), (.172, -38, 140, 0, 2.8), (.215, -33, 150, 0, 2.5),
             (.247, -33, 230, 0, 2.1), (.281, -37, 201, 0, 2.5), (0.372, -35, 190, -2, 3),
             (.481, -37, 175, -2, 2.2), (.597, -40.5, 190, 0, 2.3), (4.691, -36, 700, 18, 0.7),
             (8.34, -36, 930, -16.5, 2.6), (8.47, -49, 75, 20.5, 2.8), (8.53, -49, 75, 8, 2.2)]
CASE_HZ = 70  # for the ticks, the ports lose what lies below


def ticks():
    """Short dull taps with a snap an octave up, often stronger on one port."""
    start_s, db, hz, left_right_db, cycles = np.transpose(CASE_TAPS)
    ports = []
    for gain in sides(left_right_db):
        tap = rings(N, start_s * SR, hz / SR, cycles, amp(db) * gain, 0.)
        snap = rings(N, start_s * SR, 2 * hz / SR, np.full(len(hz), 1.6), amp(db) * gain, 0.)
        ports.append(tap + snap)
    return filtered(np.array(ports), lambda f: (1j * f / (CASE_HZ + 1j * f)) ** 2)


def scene():
    """All sources at the two ports."""
    return sizzle() + hum() + throb() + rumble() + kitchen() + pops() + ticks()


LATE_S = 33 / 44100  # right channel after left
TOP_HZ = 15900  # band limit


def record(dry):
    """The right channel runs a little late; nothing is kept above the band limit."""
    early_then_late = np.array([[1], [-1]])
    return filtered(dry, lambda hz: (hz < TOP_HZ) * np.exp(1j * np.pi * hz * LATE_S * early_then_late))


dry = scene()
out = record(dry)
dump_mix(out)
```